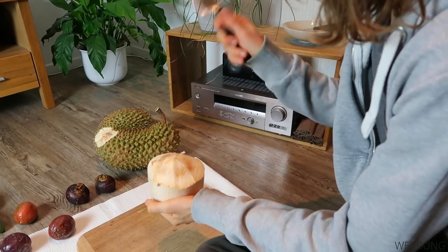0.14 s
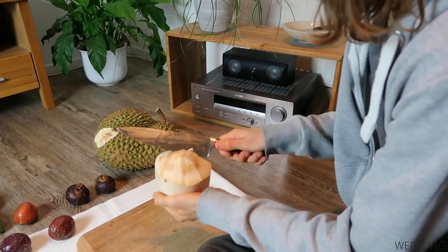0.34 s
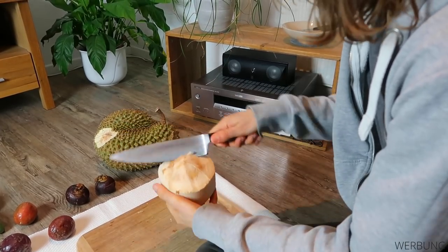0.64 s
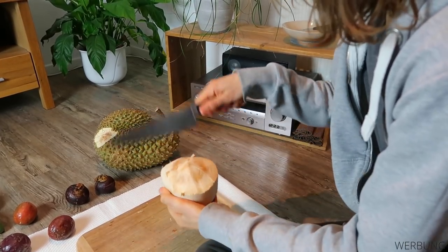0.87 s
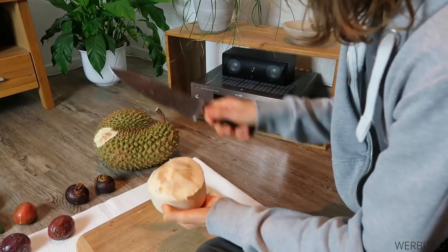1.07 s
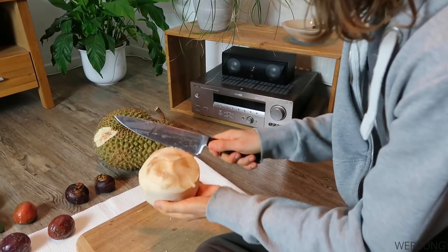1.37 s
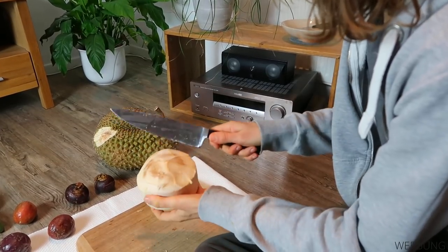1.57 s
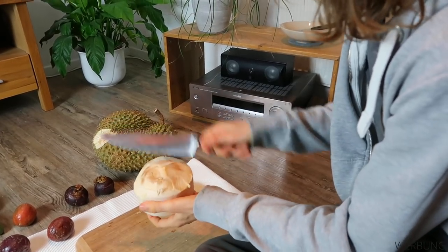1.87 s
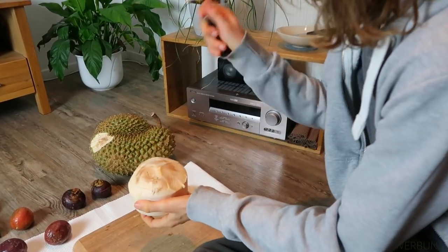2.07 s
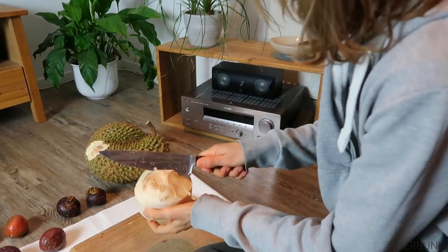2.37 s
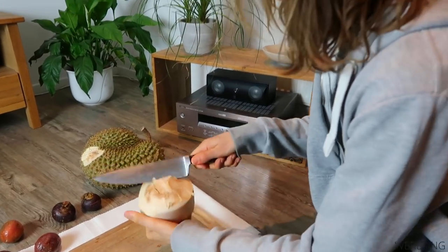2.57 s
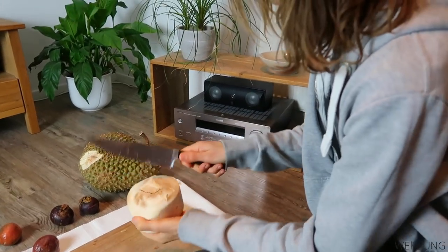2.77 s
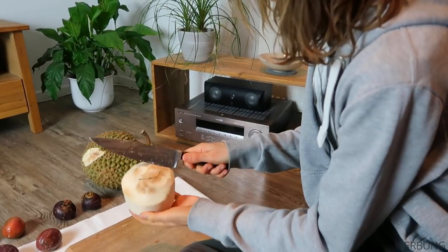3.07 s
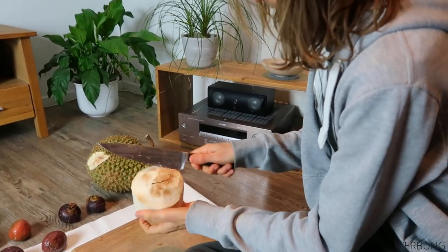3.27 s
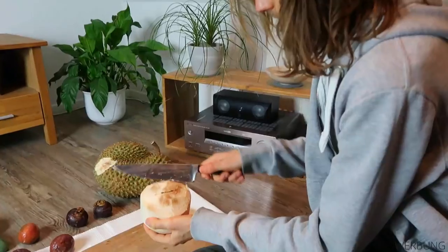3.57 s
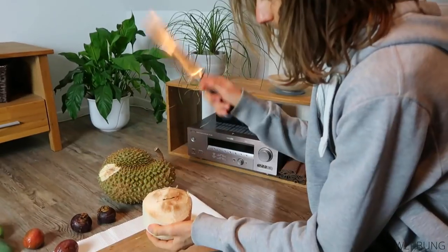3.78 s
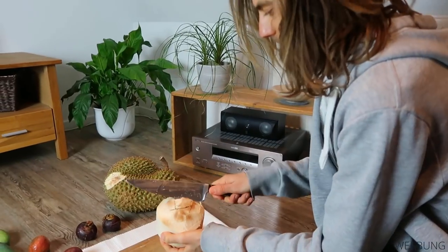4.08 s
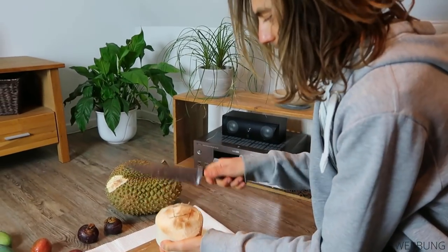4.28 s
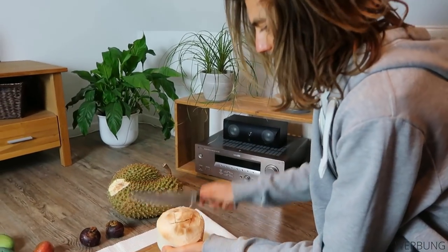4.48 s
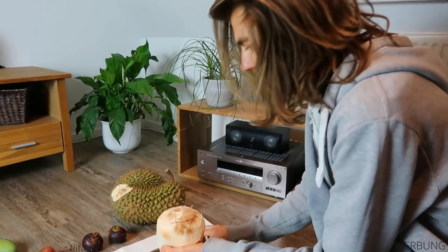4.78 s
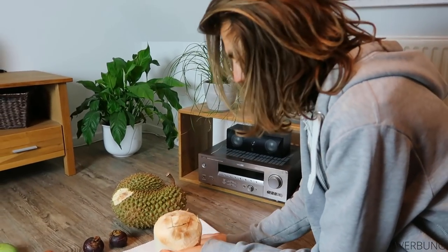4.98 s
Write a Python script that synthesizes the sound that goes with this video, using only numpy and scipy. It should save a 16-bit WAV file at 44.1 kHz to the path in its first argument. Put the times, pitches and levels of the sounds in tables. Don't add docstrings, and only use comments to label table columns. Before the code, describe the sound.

A close small stereo camera microphone in a bare, wooden-floored room picks up faint hiss and a low wavering hum. At about 0.0 s a knife softly taps a coconut and the steel rings thinly. At 0.5 s the first chop lands: a very loud, sharp woody crack with tearing husk, hollow shell ring, quick floor echo and half-second tail, overloading the microphone. The hiss drops, then creeps back. Small edge knocks and blade rings follow at 1.1 and 1.5 s, with light scrapes from 1.6 to 1.75 s and a sudden scrape and tap near 1.95 s. The second chop hits at 2.5 s, with slightly longer tearing. Blade touches ring around 3.0 s; a bright tap and harder scrape come at 3.25 s, and fainter strokes at 3.4 and 3.7 s. The third chop cracks at 4.2 s. Dull little thuds of the nut being shifted close the scene around 4.9 to 5.1 s.

```python
import sys
import numpy as np
from scipy import signal
from scipy.io import wavfile
from scipy.ndimage import uniform_filter1d

SR = 44100
rng = np.random.default_rng(int(sys.argv[2]) if len(sys.argv) > 2 else 0)


def boost_factor(decibels):
    exponent = np.asarray(decibels, float) / 20
    return 10 ** exponent


def to_wav(s):
    ch = np.atleast_2d(s).T
    pcm = np.round(np.clip(ch, -1, 1) * 32767)
    wavfile.write(sys.argv[1], SR, pcm.astype(np.int16))


N = 226453

# (f/Hz, level/dB per Hz)
CRACK = [(590, -34), (1000, -7.5), (2510, -7), (3550, 1.5), (4790, -13.5), (5820, -13), (8920, -12.5),
         (12500, -13.5), (15700, -35.5)]
LOW_CUT_HZ = 120


def evened(x):
    return x / np.sqrt(np.mean(x ** 2) + 1e-20)


def peaked(x):
    return x / (abs(x).max() + 1e-20)


def read(points, hz):
    f, value = np.transpose(points)
    return np.interp(np.log(hz + 1), np.log(f + 1), value)


def add(mix, s, sound):
    part = mix[round(s * SR):][:len(sound)]
    part += sound[:len(part)]


def resonate(x, hz, width):
    turn = np.exp(2j * np.pi * hz * np.arange(len(x)) / SR)
    r = np.exp(-np.pi * width / SR)
    return 2 * (turn * signal.lfilter([1 - r], [1, -r], x / turn)).real


def coloured(x, spectrum):
    hz = abs(np.fft.fftfreq(2048, 1 / SR))
    log_gain = np.log(boost_factor(np.maximum(read(spectrum, hz), -100)))
    taps = np.fft.ifft(np.exp(np.conj(signal.hilbert(log_gain)))).real[:1024]
    return signal.oaconvolve(x, taps)[:len(x)]


def paired(z, same, hz):
    c = np.clip(read(same, hz), -1, 1)[:, None]
    mid = np.sqrt((1 + c) / 2) * z[0]
    side = np.sqrt((1 - c) / 2) * z[1]
    return np.array([mid + side, mid - side])


def mode(hz, width):
    t = np.arange(4096) / SR
    return peaked(t * np.exp(-np.pi * width * t) * np.sin(2 * np.pi * hz * t))


def burst(ms):
    t = np.arange(4096) / SR
    return rng.standard_normal(len(t)) * (1 - np.exp(-t / 0.0009)) * np.exp(-t * 1000 / ms)


def stir_db():
    # (t/s, level over the hum/dB, half length/s)
    swells = [
        (.05, 7, .1),
        (0.302, -9, 0.2),
        (1.53, 7.5, .08),
        (1.9, 5.5, 0.21),
        (2.299, -5, .14),
        (3.444, 5.5, .2),
        (3.88, 5, .12),
        (4.98, 6, 0.15),
    ]
    t = np.arange(N) / SR
    return sum(db * np.exp(-((t - s) / half) ** 2) for s, db, half in swells)


def hum():
    # (f/Hz, width/Hz, level/dB)
    hum_bands = [(48, 7.4, -8.5), (105, 14, -1.5), (158, 33, -8.5), (262, 270, -9.5)]
    t, noise = np.arange(N) / SR, rng.standard_normal(N)
    bands = evened(sum(boost_factor(db) * evened(resonate(resonate(noise, f, w), f, w)) for f, w, db in hum_bands))
    rates = np.geomspace(1, 8, 8)
    waver = evened(sum(np.sin(2 * np.pi * (f * t + rng.random())) / np.sqrt(f) for f in rates))
    level_db, waver_db = -60.5, 2.0
    return boost_factor(level_db + waver_db * waver + stir_db()) * bands


def hiss(colour, patchy_db):
    # (f/Hz, left-right likeness)
    hiss_same = [(60, 1), (130, 0.54), (290, 0.044), (640, 0.091), (1410, 0.42), (3100, 0.27), (6820, 0.72),
                 (15000, -0.12)]
    frames, hz = N // 256 + 5, np.fft.rfftfreq(1024, 1 / SR)
    a, b, c, d, patches = rng.standard_normal((frames, 513, 5)).T
    patches = evened(uniform_filter1d(uniform_filter1d(patches, 10, 0), 14, 1))
    z = paired(np.array([a + 1j * b, c + 1j * d]), hiss_same, hz)
    z = z * boost_factor(read(colour, hz)[:, None] + patchy_db * patches)
    return evened(signal.istft(z, nperseg=1024, noverlap=768)[1][:, :N])


def rustle():
    # (f/Hz, level/dB per Hz)
    air = [(18, -39), (30, -2), (103, -11.5), (457, -11), (508, -17), (1110, -21.5), (1200, -23),
           (2090, -26), (6110, -37), (13100, -49.5), (15700, -54)]
    level_db, body_share = -54, 0.32
    return boost_factor(level_db + body_share * stir_db()) * hiss(air, patchy_db=1.9)


def room(x):
    # (f/Hz, t60/s)
    room_t60 = [(100, .42), (260, .5), (700, .54), (1400, 0.62), (3000, .54), (5500, 0.5), (9000, 0.36),
                (13000, 0.39)]
    # (f/Hz, left-right likeness)
    room_same = [(60, .97), (300, .98), (1400, .98), (2800, .92), (5000, .45), (8000, -.05), (15000, -.6)]
    taps = np.zeros((2, SR))
    at = np.arange(200, SR - 20, 20) + rng.integers(0, 20, (2, (SR - 201) // 20))
    np.put_along_axis(taps, at, rng.choice([-1., 1.], at.shape), 1)
    taps *= np.clip((np.arange(SR) / SR - .005) / 0.002, 0, 1)
    hz, t, z = signal.stft(taps, SR, nperseg=256)
    z = paired(z, room_same, hz) * boost_factor(-60 * t / read(room_t60, hz)[:, None])
    tail = signal.istft(z, SR, nperseg=256)[1]
    return signal.fftconvolve(x[None], tail / np.linalg.norm(tail[0]), axes=1)[:, :N]


def echoes(x):
    # (delay/ms, level/dB)
    reflections = [(8.8, -7.5), (9.7, -1), (11, -4), (13.5, -12), (17.5, -12), (21.5, -11), (27, -13.5)]
    taps = np.zeros((2, 2048))
    for (ms, db), skew in zip(reflections, rng.choice([-1, 1], len(reflections))):
        taps[[0, 1], round(ms * SR / 1000) + np.array([skew, -skew])] = boost_factor(db)
    return signal.oaconvolve(x[None], taps, axes=1)[:, :N]


def thuds():
    # (t/s, level/dB, f/Hz)
    pushes = [(.505, -32, 85.03), (1.078, -60, 305), (1.086, -43, 1200), (1.511, -59, 104),
              (2.963, -51, 259), (3.007, -47, 195), (3.249, -46, 200), (3.258, -48.5, 110), (4.9, -56, 178),
              (4.972, -42.5, 780), (5.125, -47.5, 800)]
    out = np.zeros(N)
    for s, db, hz in pushes:
        add(out, s, boost_factor(db + 10.5) * mode(hz, 0.66 * hz))
    return out


def knock(knock_db, hz, tick_db):
    # (f/Hz, level/dB per Hz)
    tick = [(880, -37), (1500, -2.5), (2840, -2), (3390, 1), (5700, -6), (7660, -24.5), (8280, -10.5),
            (13900, -19.5), (15700, -34.5)]
    shell = mode(hz, .5 * hz) - .7 * mode(1.5 * hz, .6 * hz) + .5 * mode(2.3 * hz, hz)
    return boost_factor(knock_db + 6.5) * shell + boost_factor(tick_db + 6.0) * peaked(coloured(burst(4.4), tick))


def knocks():
    # (t/s, knock level/dB, knock f/Hz, tick level/dB)
    touches = [(.445, -53, 1200, -61.5), (1.076, -42.5, 1150, -46), (1.086, -57, 1600, -61),
               (1.511, -63, 1158, -49.5), (1.721, -49.5, 1150, -74), (1.786, -54, 1900, -60),
               (2.965, -46.5, 1610, -48), (3.007, -45.5, 900, -54), (3.259, -59, 1150, -53),
               (3.43, -58, 1170, -65), (4.971, -60, 895, -58)]
    out = np.zeros(N)
    for s, *touch in touches:
        add(out, s, knock(*touch))
    return out


def scrape():
    # (t of most pressure/s, level/dB, rise/dB per s, fall/dB per s)
    strokes = [
        (1.6, -59, 300, 154),
        (1.686, -57, 285.5, 255.5),
        (1.75, -60.5, 59.5, 60.5),
        (1.97, -50.5, 900, 200.5),
        (3.27, -42.5, 901, 450),
        (3.43, -49, 201, 300),
        (3.66, -63.5, 120, 151),
    ]
    # (f/Hz, width/Hz, level/dB)
    husk_modes = [(1150, 340, 1), (2100, 260, -5), (3500, 1300, -5.5), (6300, 800, -23),
                  (10000, 5600, -14.5)]
    slips_per_s = 1400
    t = np.arange(N) / SR
    pressure = sum(boost_factor(db - np.where(t < s, rise * (s - t), fall * (t - s))) for s, db, rise, fall in strokes)
    chance, size, sign = rng.random((N, 3)).T
    slips = (chance < slips_per_s / SR) * boost_factor(-4.0 * np.log(size + 0.018)) * np.sign(sign - .5)
    husk = sum(boost_factor(db) * evened(resonate(slips, hz, width)) for hz, width, db in husk_modes)
    return pressure * evened(husk)


def blade(hz, db, t60, dip):
    grip_after_s, grip_db_per_s = .18, 250
    t = np.arange(SR // 2) / SR
    beat = 1 + 1.2 * np.cos(np.pi * t / dip) * np.exp(-t / (5.0 * dip))
    decay = boost_factor(db - 60 * t / t60 - grip_db_per_s * np.maximum(t - grip_after_s, 0))
    return decay * (1 - np.exp(-t / 0.0007)) * beat * np.sin(2 * np.pi * hz * t)


def blade_rings():
    # (t/s, f/Hz, level/dB, first dip/s)
    free = [(.021, 9200, -61, .14), (.021, 10710, -66, .08), (1.08, 5760, -68, .06),
            (1.08, 10710, -71, .05), (1.082, 2977, -58, .13), (1.082, 6212, -62, .08),
            (1.082, 7070, -65, .045), (1.513, 6212, -62, .115), (1.513, 8250, -71, .04),
            (2.969, 4550, -64, .06), (2.975, 8120, -58.5, .086), (2.978, 6212, -60, .045),
            (2.985, 3000, -59, .055), (2.99, 7060, -58, .21), (2.99, 10710, -68, .05),
            (3.38, 2977, -64, .03), (3.425, 1170, -55, .07)]
    # (f/Hz, t60/s)
    blade_t60 = [(1160, .2), (3000, .24), (4400, .15), (5700, .12), (6200, .85), (7100, .85), (8000, .14),
                 (11000, .22)]
    # (t/s, f/Hz, level/dB)
    choked = [(.021, 2977, -57), (.021, 3879, -58), (.03, 6350, -65), (.03, 7176, -63), (1.957, 10870, -54),
              (1.98, 12500, -62), (2.962, 3400, -57), (3.247, 2200, -56), (3.247, 3280, -51),
              (3.247, 4390, -49), (3.247, 5000, -53), (3.25, 6223, -50), (3.25, 7380, -54),
              (3.25, 10800, -53), (3.25, 12470, -50), (3.25, 14400, -52), (3.256, 1120, -47),
              (3.26, 9329, -49), (3.29, 1170, -52), (3.44, 2100, -59), (3.66, 7045, -68), (3.68, 7890, -74),
              (3.7, 6212, -69)]
    out = np.zeros(N)
    for s, hz, db, dip in free:
        add(out, s, blade(hz, db + 5.5, read(blade_t60, hz), dip))
    for s, hz, db in choked:
        add(out, s, blade(hz, db + 5.0, t60=0.092, dip=0.052))
    return out


def bite(ms, crack_db):
    fibres = coloured(rng.standard_normal(1000), CRACK)[:round(ms * SR / 1000)]
    return boost_factor(crack_db - 34) * evened(fibres) * np.linspace(.45, 1.3, len(fibres))


def crack(split_ms, crack_db):
    return boost_factor(crack_db) * peaked(coloured(burst(split_ms), CRACK))


def shell_ring(shell):
    # (f/Hz, width/Hz, level/dB)
    water = [(510, 270, -11), (854, 230, -9.5)]
    bending_lag, longest_lag_s = .11, .002
    ring = np.zeros(4096)
    for k, (hz, width, db) in enumerate(list(shell) + water):
        lag_s = np.clip(bending_lag * (hz ** -.5 - 7000 ** -.5), 0, longest_lag_s)
        add(ring, lag_s, (-1) ** k * boost_factor(db) * mode(hz, 1.134 * width))
    return peaked(ring)


def radiation(colour, tones):
    click = coloured(signal.unit_impulse(4096), colour)
    click = click + sum(boost_factor(db) * resonate(click, hz, width) for hz, width, db in tones)
    return evened(click) / 64


def chops():
    # (t/s, shell level/dB, splitting time/ms, crack level/dB, room level/dB)
    hits = [
        (0.0187, -19, 0.97, -42, -30.5),
        (0.5049, 11, 1.8, 9, -3),
        (1.9550, -19.5, 1.5, -27.5, -35),
        (2.4806, 10, 3.3, 7, -4.5),
        (3.2464, -22, 4.1, -27.5, -39),
        (4.1894, 14, 1.8, 5, -1.5),
    ]
    # (f/Hz, width/Hz, level/dB)
    shells = [
        [(387, 180, 9), (1146, 110, 2), (1470, 200, -1), (1993, 110, -0.5), (2950, 29, -16), (3320, 65, -18),
         (4070, 210, -20)],
        [(1200, 230, 0.5), (2120, 200, -10), (3219, 200, -2.5), (5630, 600, -18.5), (6236, 71, -19)],
        [(341, 310, 1), (1250, 340, -5), (2300, 450, -4), (3364, 900, 1), (5700, 600, -8), (6700, 330, -17.5)],
        [(315, 250, -4.5), (1506, 380, 5), (2057, 400, -1.5), (3198, 340, 1.5), (3550, 400, -0.5),
         (800, 270, -7), (5050, 550, -16), (5370, 190, -16), (6700, 99, -14)],
        [(3270, 280, 0.5), (4210, 330, 10.5), (5000, 190, 2.5), (6100, 180, -17), (8200, 230, -9)],
        [(560, 440, -3.5), (1301.4, 450, 2.5), (2232, 400, 4), (3376, 390, -0.5), (4355, 690, -7),
         (5570, 160, -13.5), (6950, 170, -31)],
    ]
    # (f/Hz, level/dB per Hz)
    colours = [
        [(59, -52.5), (312, 1.5), (743, -13.5), (1470, -13), (2970, -31.5), (9650, -40.5), (14000, -65.5)],
        [(59, -47.5), (240, -11), (594, -20.5), (1240, -6), (2520, -15.5), (3610, -13), (11500, -20.5),
         (13500, -60.5)],
        [(59, -38.5), (305, 0), (759, -17.5), (1900, -20), (3500, -22), (11200, -35), (14000, -69)],
        [(59, -41), (270, -5.5), (594, -11.5), (1920, -7.5), (2520, -13), (3460, -10.5), (11700, -23.5),
         (13500, -60)],
        [(59, -17.5), (326, -11.5), (564, -33), (1110, -14), (2810, -21), (4020, -11), (9150, -4),
         (15500, -35.5)],
        [(59, -57), (130, -21), (450, -14), (1190, -7), (3110, -16), (9070, -21), (11500, -25.5), (14000, -66)],
    ]
    # (f/Hz, width/Hz, level/dB)
    lingering = [
        [(1150, 250, -0.5), (1490, 290, 1), (1970, 270, 1), (3905, 200, 0)],
        [(1315, 200, -2), (1900, 150, -3.5), (3350, 560, 0)],
        [(2220, 200, -3), (3400, 290, -2.5)],
        [(1500, 120, -3), (1950, 200, -1), (3440, 350, 0.5)],
        [(1140, 120, -1), (3170, 200, 7), (4270, 250, 5)],
        [(1170, 200, -3), (2230, 120, 1.5), (3570, 250, -3), (4302, 140, 6), (5500, 200, 1.5)],
    ]
    close, sideways, reflected, radiated = np.zeros((4, N))
    for hit, shell, colour, tones in zip(hits, shells, colours, lingering):
        s, shell_db, split_ms, crack_db, room_db = hit
        direct = boost_factor(shell_db) * shell_ring(shell) + crack(split_ms, crack_db)
        add(close, s, direct)
        add(reflected, s, boost_factor(room_db + 9.5) * peaked(direct))
        add(sideways, s, crack(2 * split_ms, crack_db - 2.5))
        bite_ms = 2.5 + 1.5 * s
        add(close, s - bite_ms / 1000, bite(bite_ms, crack_db))
        add(radiated, s, boost_factor(room_db + 30) * radiation(colour, tones))
    return close, sideways, reflected, radiated


def scene():
    blows, sideways, reflected, radiated = chops()
    light = thuds() + knocks() + scrape()
    steel = blade_rings()
    dry = blows + light + steel
    treble = signal.butter(3, 6000, "high", fs=SR)
    side = signal.lfilter(*treble, sideways + 0.32 * (light + steel))
    near = np.array([dry + side, dry - side])
    early = echoes(reflected + 0.3 * light)
    tail = room(radiated + boost_factor(-3.0) * (light + 0.54 * steel))
    return near + early + tail + rustle() + hum()


def roll_off(x):
    return signal.sosfilt(signal.butter(12, 15830, fs=SR, output="sos"), x)


def record(dry):
    # (f/Hz, level/dB per Hz)
    self_hiss = [(30, -8.5), (300, -10), (1500, -12), (6000, -21.5), (13000, -35.5), (15700, -42)]
    dry = signal.lfilter(*signal.butter(1, LOW_CUT_HZ / 2, "high", fs=SR), dry)
    power_db = 10 * np.log10(abs(uniform_filter1d((dry ** 2).mean(0), 400, origin=199)) + 1e-12)
    fall = np.arange(N) * 13.0 / SR
    held_db = np.maximum.accumulate(np.maximum(power_db + fall, -14.0)) - fall
    cut_db = np.clip(held_db + 24.0, 0, 14.5)
    smooth_db = signal.lfilter([.004], [1, -.996], cut_db - cut_db[0]) + cut_db[0]
    ducked = dry / boost_factor(smooth_db) + boost_factor(-72.5) * hiss(self_hiss, patchy_db=1.5)
    knee = 3.0
    clipped = 1.127 * ducked / (1 + abs(ducked) ** knee) ** (1 / knee)
    clipped = signal.lfilter(*signal.butter(2, 14000, fs=SR), clipped)
    low_cut = signal.butter(2, 0.3 * LOW_CUT_HZ, "high", fs=SR)
    return roll_off(signal.lfilter(*low_cut, clipped))


dry = scene()
out = record(dry)
to_wav(out)
```